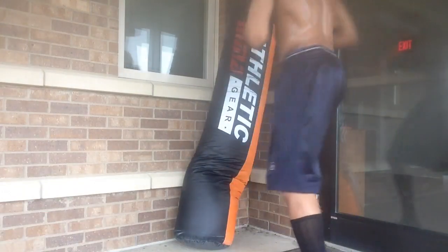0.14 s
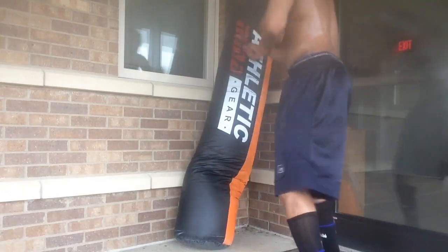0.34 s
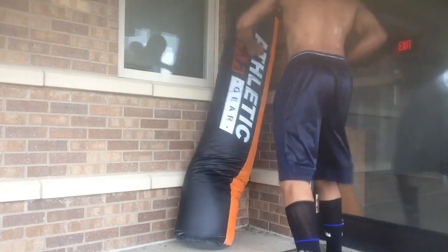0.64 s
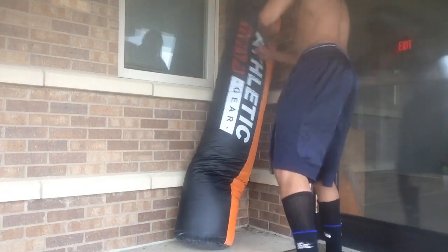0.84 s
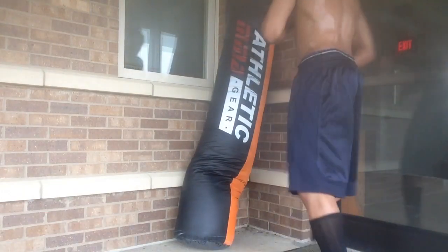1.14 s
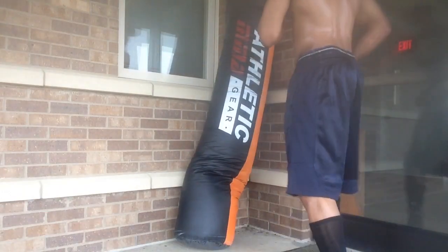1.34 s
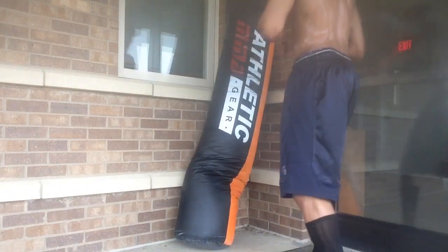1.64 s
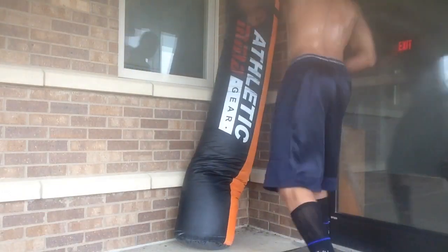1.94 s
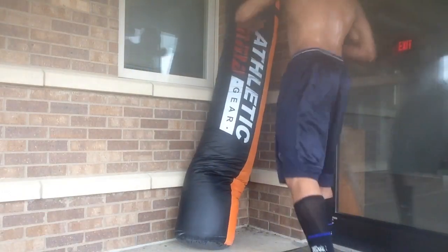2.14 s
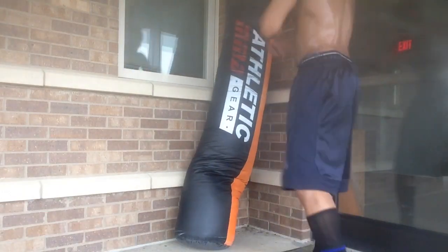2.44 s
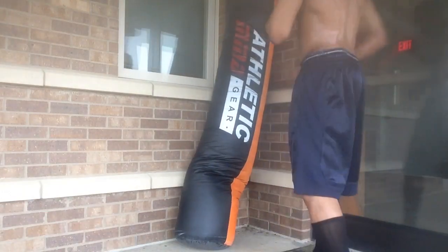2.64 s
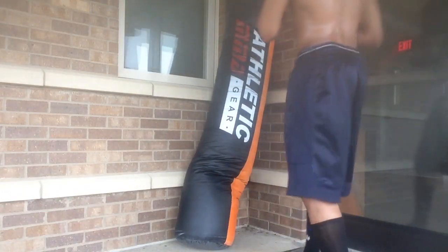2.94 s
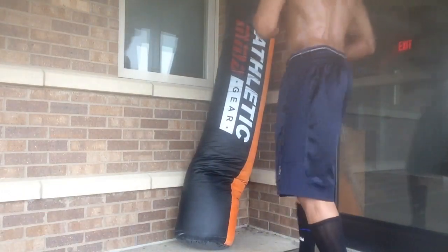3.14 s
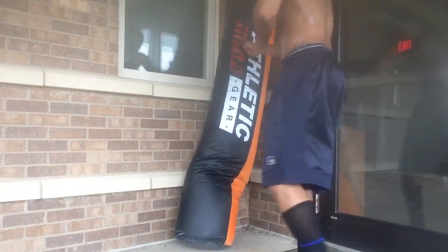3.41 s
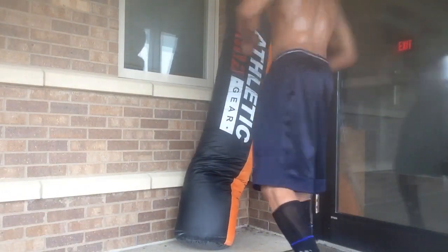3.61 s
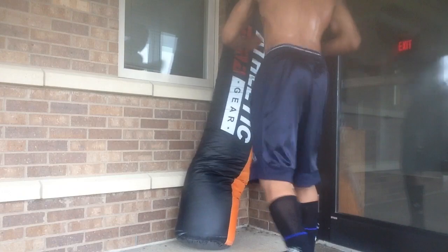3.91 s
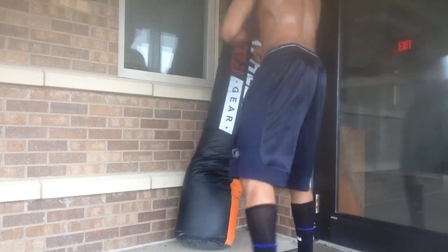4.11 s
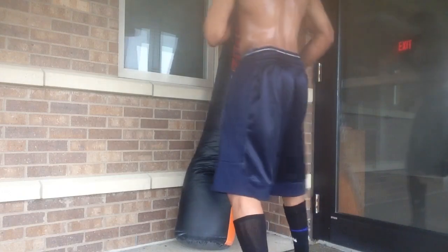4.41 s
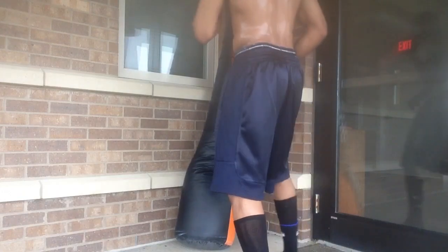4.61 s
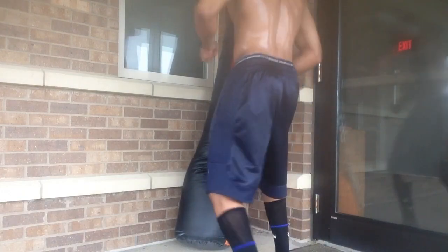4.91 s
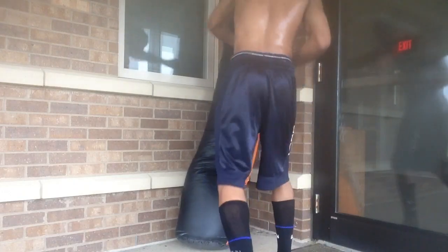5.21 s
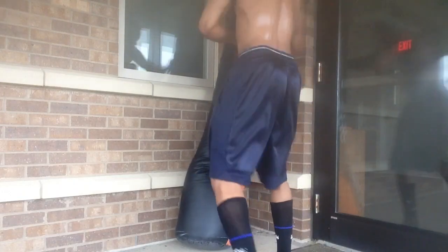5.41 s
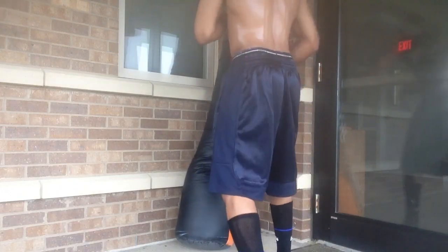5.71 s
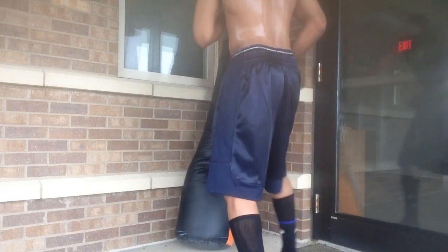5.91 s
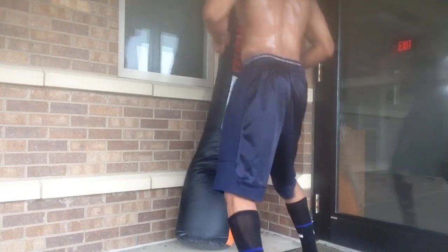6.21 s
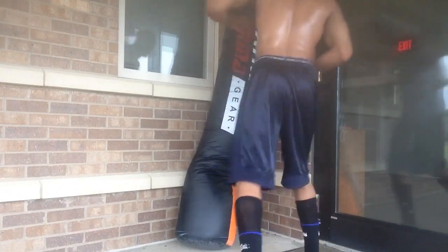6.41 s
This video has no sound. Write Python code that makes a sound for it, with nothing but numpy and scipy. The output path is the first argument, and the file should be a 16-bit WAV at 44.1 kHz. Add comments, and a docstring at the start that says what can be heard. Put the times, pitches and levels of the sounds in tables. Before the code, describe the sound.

Ten bare, hard punches hit a heavy vinyl bag leaning in a brick corner beside a glass door. Three come fast, then a pair, a lone blow and a quick pair, then a final pair, with rests between. Each joins a deep padded thump to a crackling slap, with a short hard echo. Vinyl and cloth rub afterwards, and soles scuff lightly. Close single microphone outdoors, over a low distant rumble and a few faint late bird chirps.

```python
"""Ten punches land on a heavy bag, heard close by, where it leans in a brick corner beside a glass door.
Each blow is a slow wave of padding, a damped knock of the core, a pop of trapped air and a crackling slap
of vinyl, built from noise bursts and dying sines; the entrance answers with a short noise-made echo.
Grainy noise rubs, swishes and scuffs around the blows, and low dying sines make the thuds.
Far off, a bird chirps in gliding sines over a rumble and a faint hum of filtered noise."""
import sys
import numpy as np
from scipy import signal
from scipy.fft import rfft, irfft, next_fast_len
from scipy.io import wavfile

SR = 44100
rng = np.random.default_rng(int(sys.argv[2]) if len(sys.argv) > 2 else 0)


def dump_mix(stems):
    """Bounce the given channels to the path in sys.argv[1] as a 16-bit WAV at rate SR."""
    frames = np.atleast_2d(stems).T  # one column per channel
    limited = np.clip(frames, -1, 1)  # hard clip at full scale
    pcm = np.round(limited * 32767).astype(np.int16)
    wavfile.write(sys.argv[1], SR, pcm)


N = 288855
TIME = np.arange(N) / SR   # the whole scene, seconds
BLOW = np.arange(SR // 4) / SR   # the quarter second given to each short sound

# Levels in the tables are those of each source before the final mix.
# The punches. Each row: contact in seconds, heave of the padding in dB, knock of the core in dB,
# slap of the vinyl in dB, hollowness in dB, air pocket in Hz, skin in Hz, crease in Hz.
PUNCH_LIST = [(0.36, -16, -29.5, -27.7, 4, 510, 1035, 3350), (0.7016, -15, -29, -28, -3, 430, 1020, 2540),
              (0.93, -17.5, -28.5, -29.5, -1, 550, 1255, 5150),
              (2.1174, -18, -24.8, -26.4, 6, 480, 925, 2970),
              (2.3558, -17, -31, -28.2, -6.5, 380, 974, 2500),
              (3.484, -16, -23.2, -25.3, 5.5, 560, 960, 2750),
              (3.8886, -20.3, -26.3, -32.7, -3, 440, 950, 2580),
              (4.1214, -17.5, -26, -33.8, 2, 460, 821, 2500),
              (5.2564, -20.5, -27, -26.8, 2.5, 640, 1570, 4650),
              (5.506, -15.5, -28.5, -28, -.5, 650, 915, 2780)]
# Spectrum of the vinyl slap. Each row: frequency in Hz, relative density in dB per Hz.
SLAP_SPECTRUM = [(100, 2.5), (300, -1), (500, 0), (1000, -8.5), (2000, -12), (3200, -9.5), (5000, -15.5),
                 (7400, -14.5), (8600, -22), (12000, -30), (15500, -34)]
# Nearest walls and floor. Each row: typical delay in seconds, level in dB.
NEAR_ECHOES = [(.0024, 0), (.0045, -5), (.0063, -6.5), (0.0115, -8.5), (0.0189, -20.5)]
# Low resonances of the corner. Each row: frequency in Hz, typical level in dB, 60 dB decay in seconds.
BOOM_MODES = [(63.5, -7, .2), (85.5, -2, 0.32), (159.3, 0, .32), (175, -4.5, .18), (230.2, -1, .2),
              (287, -5.5, 0.17), (362, -10.5, 0.15), (475, -9.5, 0.22)]
# Spectrum of rubbing before brightening. Each row: frequency in Hz, relative density in dB per Hz.
RUB_SPECTRUM = [(100, -11), (500, 0.5), (1500, -1.5), (3000, -9.5), (7500, -14.5), (10000, -19.5),
                (15500, -31)]

# Strokes of rubbing around a punch. Each row: delay from contact in seconds, level in dB,
# spread of the stroke in seconds (one standard deviation), brightening in dB per decade.
# After a blow, delay and level are those for a slap of usual strength.
ARM_SWING = (-.012, -65, .019, 0)   # cloth swishes as the arm swings in
BAG_REBOUND = (.135, -69, .028, 9)   # the bag springs back from a lone blow
BAG_TWIST = (.155, -56.3, .026, 5.5)   # cloth and vinyl rub inside a quick pair of blows
BAG_SLIDE = (.093, -45.8, .02, 7)   # the closing blow pushes the bag along the wall
BAG_SETTLE = (.195, -66.5, .029, 2.5)   # after the slide the bag slips back
# Soles scuffing in the pauses. Each row: centre in seconds, level in dB,
# spread in seconds (one standard deviation), brightening in dB per decade.
SOLE_SCUFFS = [(2.795, -63, .035, -2), (2.85, -62.5, .018, 0), (5.967, -68.5, .0044, 3.5),
               (6.548, -57.5, .024, -2.5)]
# Creases popping back out. Each row: start in seconds, level in dB, lowest frequency in Hz.
CREASE_POPS = [(.837, -52, 6800), (1.139, -55.5, 2800), (2.654, -68, 4500), (4.299, -72, 5500)]
# Dull bumps of feet and of the bag's base. Each row: start in seconds, level in dB, pitch in Hz,
# 60 dB decay in seconds.
DULL_BUMPS = [(.575, -50.5, 89.9, 0.2), (2.449, -25, 459, 0.04), (2.955, -41, 80, 0.18),
              (3.99, -46, 90, 0.1)]
# Far bird. Each row: start in seconds, length in seconds, start pitch in Hz, end pitch in Hz,
# level in dB.
BIRD_CHIRPS = [(5.785, .05, 5100, 3400, -72), (6.15, .04, 4300, 3500, -76), (6.185, .04, 2800, 3500, -75),
               (6.29, .035, 6000, 5000, -75)]
# Decay of the entrance, apart from the faint tail. Each row: frequency in Hz, 60 dB decay in seconds.
ENTRANCE_DECAY = [(150, .34), (500, 0.24), (1500, 0.18), (5000, 0.14), (12000, 0.099)]
# Colour given to the echoes. Each row: frequency in Hz, gain in dB.
WALL_COLOUR = [(60, -15), (150, -3), (300, 2.5), (550, -7.5), (780, -6), (1150, 0), (3000, -0.3),
               (5000, -1), (7400, 4), (8800, -3), (11000, -2), (15000, -7)]
# Spectrum of the open air. Each row: frequency in Hz, relative density in dB per Hz.
AIR_SPECTRUM = [(25, -13), (60, -3), (100, 4.5), (160, -5.5), (260, -10.5), (360, -14.5), (550, -18.5),
                (1000, -22), (2000, -22), (4000, -32.5), (8000, -37.8), (15000, -49)]

POP_DB, SMACK_DB, CRACK_DB, FIZZ_DB = 2.8, 2.1, -1.0, -3.1   # parts of a slap, against its level
POP_PER_HOLLOW, SMACK_PER_HOLLOW = .55, .35   # dB per dB: a hollow slap pops more and smacks less
USUAL_SLAP_DB = -29
CRUMPLE_DB, CRUMPLE_PER_DB = .8, .8   # a weak slap is a glancing one and crumples more (dB per dB)
QUICK_S, PAUSE_S = .3, .6   # a shorter rest makes a quick pair, a longer one a pause
CLOSING_DULL_DB = 2.0   # the punch before a pause fizzes less
BOOM_DB = -8.5   # the corner's boom, against the mean of heave and knock
FAR_WALL_S, FAR_WALL_DB = .043, -20   # the deep wave returns once
LAG_S_PER_DB = .003   # after a harder slap the bag travels longer before it rubs
RUB_PER_DB = .35   # and rubs louder (dB per dB)
AIR_DB = -60
HUM_HZ, HUM_DB = 358, -74
CUTOFF_HZ = 15400


def punches():
    """All blows on the bag, as a bright part that fills the entrance with echoes and a deep part."""
    bright, deep = np.zeros(N), np.zeros(N)
    for (s, heave_db, knock_db, *vinyl), rest_s in zip(PUNCH_LIST, rests()):
        dull_db = CLOSING_DULL_DB * (rest_s > PAUSE_S)
        add(bright, s - BLOW[-1], puff())   # ends at contact
        add(bright, s, slap(*vinyl, dull_db=dull_db))
        add(bright, s, knock(knock_db))
        lead_s, wave = heave(heave_db)
        add(deep, s - lead_s, wave)
        add(deep, s - lead_s + FAR_WALL_S, from_db(FAR_WALL_DB) * wave)
        add(deep, s + .004, corner_boom((heave_db + knock_db) / 2 + BOOM_DB))
    return bright, deep


def rests():
    """Seconds from each punch to the next, endless after the last."""
    return np.diff([s for s, *_ in PUNCH_LIST], append=np.inf)


def slap(db, hollow_db, pocket_hz, skin_hz, crease_hz, dull_db):
    """The contact pops the trapped air, smacks the taut skin and cracks its creases."""
    touch = colour(contact(CRUMPLE_DB + CRUMPLE_PER_DB * (USUAL_SLAP_DB - db)), SLAP_SPECTRUM)
    pop = unit(band(touch, 370, 680)) - .9 * unit(ring(pocket_hz, t60=.03))
    smack = unit(band(touch, 880, 1700, order=3)) + .8 * unit(ring(skin_hz, t60=0.036))
    creased = touch + 2.2 * resonate(touch, crease_hz, q=6)   # the fold under the fist has its own pitch
    crack = band(creased, 2000, 4200, order=3)
    fizz = band(creased, 4200, 17000, order=3)
    parts = burst(pop, POP_DB + POP_PER_HOLLOW * hollow_db)
    parts += burst(smack, SMACK_DB - SMACK_PER_HOLLOW * hollow_db)
    parts += burst(crack, CRACK_DB)
    parts += burst(fizz, FIZZ_DB - dull_db)
    return from_db(db) * parts


def contact(crumple_db, touch_s=0.00058, fold_s=.008, grain_db=4.0, echo_s=.0014):
    """A sharp touch, scattered back by the nearest walls, while creases of vinyl snap flat."""
    grain = from_db(grain_db * rng.standard_normal(len(BLOW)))
    snaps = rng.standard_normal(len(BLOW)) * grain
    out = from_db(crumple_db - 1) * unit(snaps * np.exp(-BLOW / fold_s))
    out += 0.53 * unit(rng.standard_normal(len(BLOW)) * np.exp(-BLOW / touch_s))
    out[0] -= .55   # the first instant of contact
    for delay_s, db in NEAR_ECHOES:
        lag = max(int(delay_s * SR * rng.uniform(.85, 1.15)), 1)   # each blow lands in another spot
        echo = unit(rng.standard_normal(len(BLOW)) * np.exp(-BLOW / echo_s))
        out[lag:] += from_db(db) * echo[:-lag]
    return out


def heave(db, hz=68, swell_s=.0125, lead_s=0.015, width=0.305):
    """The padding draws in, bulges and settles in about two slow cycles; starts lead_s before contact."""
    t = BLOW - lead_s
    peak_s = lead_s + swell_s * .7
    swell = np.exp(-.5 * (np.log((BLOW + 1e-6) / peak_s) / width) ** 2)
    sway = np.sin(2 * np.pi * hz * rng.uniform(1.0, 1.05) * (t - .0018))
    return lead_s, burst(swell * sway, db)


def knock(db, hz=170, swell_s=0.0092, rough=0.27):
    """The core of the bag is shoved against the wall: a short, heavily damped knock."""
    core = np.sin(2 * np.pi * hz * rng.uniform(.93, 1.07) * (BLOW - .003))
    filling = band(rng.standard_normal(len(BLOW)), 110, 340)
    swell = BLOW * np.exp(-BLOW / swell_s)
    return burst(unit(core * swell) + rough * unit(filling * swell), db)


def corner_boom(db, rise_s=0.0087):
    """Each blow wakes the corner's low resonances with strengths of its own."""
    modes = np.zeros(len(BLOW))
    for k, (hz, level_db, t60) in enumerate(BOOM_MODES):
        strength = from_db(level_db + rng.normal(0, 0.58))
        modes += ring(hz, t60) * strength * (-1) ** k   # neighbours start in opposite directions
    return burst(modes * (1 - np.exp(-BLOW / rise_s)), db)


def puff(db=-48, rise_s=0.0036):
    """Air is squeezed from between fist and bag, swelling up to the moment of contact."""
    air = band(rng.standard_normal(len(BLOW)), 140, 650, order=3)
    return burst(air * np.exp(-BLOW[::-1] / rise_s), db)


def rubbing():
    """Cloth swishes around each punch; what rubs after it depends on how soon the next one comes."""
    out = np.zeros(N)
    swing_delay_s, *swing = ARM_SWING
    for (s, _, _, slap_db, *_), rest_s in zip(PUNCH_LIST, rests()):
        add(out, s + swing_delay_s - BLOW.mean(), rub(*swing))
        if rest_s < QUICK_S:
            strokes = [BAG_TWIST]
        elif rest_s > PAUSE_S:
            strokes = [BAG_SLIDE, BAG_SETTLE]
        else:
            strokes = [BAG_REBOUND]
        force_db = slap_db - USUAL_SLAP_DB
        for delay_s, db, spread_s, bright_db in strokes:
            centre_s = s + delay_s + LAG_S_PER_DB * force_db
            stroke = rub(db + RUB_PER_DB * force_db, spread_s, bright_db)
            add(out, centre_s - BLOW.mean(), stroke)
    return out


def rub(db, spread_s, bright_db, grain_db=5.0, clump_db=1.5):
    """Tiny slips, gathered in clumps, under one stroke that is centred in the returned sound."""
    t = BLOW - BLOW.mean()
    clumps = signal.resample(rng.standard_normal(60), len(t))
    grain = from_db(grain_db * rng.standard_normal(len(t)) + clump_db * clumps)
    slips = rng.standard_normal(len(t)) * grain
    spectrum = [(hz, level_db + bright_db * np.log10(hz)) for hz, level_db in RUB_SPECTRUM]
    slips = colour(slips, spectrum)
    stroke = np.exp(-.5 * (t / spread_s) ** 2)
    return from_db(db) * slips / slips.std() * stroke


def shifting(crease_s=0.01):
    """Soles scuff as grainy noise, creases pop as sparse snaps, feet and base bump as dying sines."""
    out = np.zeros(N)
    for s, db, spread_s, bright_db in SOLE_SCUFFS:
        add(out, s - BLOW.mean(), rub(db, spread_s, bright_db))
    for s, db, low_hz in CREASE_POPS:
        sparse = rng.standard_normal(len(BLOW)) ** 3   # cubing lets few snaps stand out
        snaps = sparse * np.sqrt(BLOW) * np.exp(-BLOW / crease_s)
        add(out, s, burst(band(colour(snaps, SLAP_SPECTRUM), low_hz, 17000), db))
    for s, db, hz, t60 in DULL_BUMPS:
        soft_start = 1 - np.exp(-BLOW / 0.0021)
        add(out, s, from_db(db) * ring(hz, t60) * soft_start)
    return out


def entrance(x, build_s=0.007, late_db=-19, late_t60=0.43, spill=0.22, diffuse=.55):
    """Brick and glass return part along fixed paths, part as diffuse wash; a faint yard tail follows."""
    t = TIME[:SR]
    edges = np.geomspace(90, 18000, 12)   # band edges, Hz
    washes, paths = np.zeros(N), np.zeros(len(t))
    for low, high in zip(edges, edges[1:]):
        early = from_db(-60 * t / at_hz(ENTRANCE_DECAY, np.sqrt(low * high)))
        late = from_db(late_db - 60 * t / late_t60)
        decay = unit((early + late) * (1 - np.exp(-(t / build_s) ** 2)))
        path = unit(band(rng.standard_normal(len(t)), low, high, order=4) * decay)
        paths += path * np.sqrt(2 * (high - low) / SR)
        # the wash follows the energy of the sound, with some spilling in from beside the band
        fed = band(x, low, high) ** 2 + spill * band(x, low, high, order=1) ** 2
        energy = np.maximum(signal.fftconvolve(fed, decay ** 2)[:N], 0)
        wash = band(rng.standard_normal(N), low, high, order=4)
        washes += np.sqrt(diffuse * energy) * wash / wash.std()
    fixed = np.sqrt(1 - diffuse) * signal.fftconvolve(x, paths)[:N]
    return colour(washes + fixed, WALL_COLOUR)


def bird(waver_hz=150):
    """Thin whistles of a far bird: sines that glide and waver in pitch."""
    out = np.zeros(N)
    for s, length_s, start_hz, end_hz, db in BIRD_CHIRPS:
        u = np.linspace(0, 1, int(length_s * SR))
        waver = waver_hz * signal.resample(rng.standard_normal(20), len(u))
        hz = start_hz + (end_hz - start_hz) * u ** 2 + waver
        whistle = np.sin(2 * np.pi * np.cumsum(hz) / SR)
        add(out, s, from_db(db) * np.sin(np.pi * u) * whistle)
    return out


def outdoors():
    """Steady distant rumble and hiss, with the faint wavering hum of a far machine."""
    air = colour(rng.standard_normal(N), AIR_SPECTRUM)
    hum = resonate(rng.standard_normal(N), HUM_HZ, q=50)
    return from_db(AIR_DB) * air / air.std() + from_db(HUM_DB) * hum / hum.std()


def from_db(db):
    """Decibels to gain."""
    return 10 ** (np.asarray(db) / 20)


def unit(x):
    """Scale to an energy of one."""
    return x / np.sqrt(np.sum(x ** 2) + 1e-20)


def burst(x, db):
    """Scale a short sound to a level taken over a fiftieth of a second."""
    return unit(x) * np.sqrt(SR / 50) * from_db(db)


def at_hz(points, hz):
    """Read a table on a log-frequency axis."""
    f, v = np.transpose(points)
    return np.interp(np.log(np.maximum(hz, 1)), np.log(f), v)


def add(out, s, x):
    """Mix a sound in at a given time."""
    i = max(round(s * SR), 0)
    out[i:i + len(x)] += x[:max(N - i, 0)]


def band(x, low_hz, high_hz, order=2):
    """Causal band-pass."""
    edges = [low_hz, min(high_hz, SR / 2 - 1)]
    sos = signal.butter(order, edges, "band", fs=SR, output="sos")
    return signal.sosfilt(sos, x + 1e-18)


def colour(x, spectrum):
    """Causal (minimum-phase) filter with the given spectrum, by folding its cepstrum."""
    n = 2 * next_fast_len(len(x))
    hz = np.arange(n // 2 + 1) * SR / n
    cepstrum = irfft(np.log(from_db(at_hz(spectrum, hz))))
    cepstrum[1:n // 2] *= 2
    cepstrum[n // 2 + 1:] = 0
    return irfft(rfft(x, n) * np.exp(rfft(cepstrum)))[:len(x)]


def resonate(x, hz, q):
    """Resonance with a gain of one on top."""
    return signal.lfilter(*signal.iirpeak(hz, max(q, .5), fs=SR), x + 1e-18)


def ring(hz, t60):
    """A dying sine that falls 60 dB in t60 seconds."""
    return np.sin(2 * np.pi * hz * BLOW) * from_db(-60 * BLOW / t60)


def scene():
    """Blows and small sounds in the entrance, over the open air."""
    bright, deep = punches()
    near = bright + rubbing() + shifting()
    close = from_db(2.0) * near + deep
    echoes = from_db(-6.5) * entrance(near)
    return (close + echoes + bird() + outdoors())[None]   # one channel


def record(dry, top=0.74):
    """The microphone drops the deepest bass, rounds the peaks and cuts the top."""
    x = signal.sosfilt(signal.butter(2, 31, "high", fs=SR, output="sos"), dry)
    x = top * np.tanh(x / top)
    return signal.sosfilt(signal.ellip(12, .1, 70, CUTOFF_HZ, fs=SR, output="sos"), x)


dry = scene()
out = record(dry)
dump_mix(out)
```